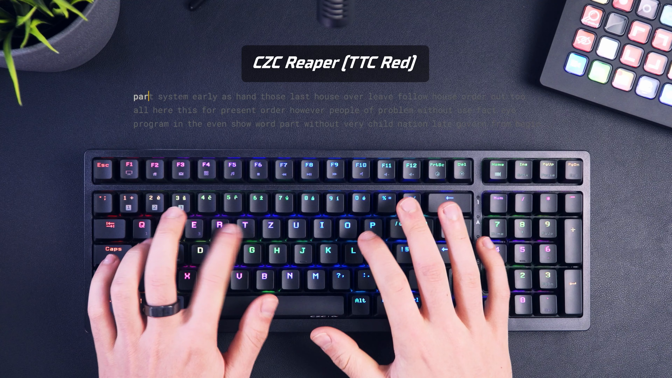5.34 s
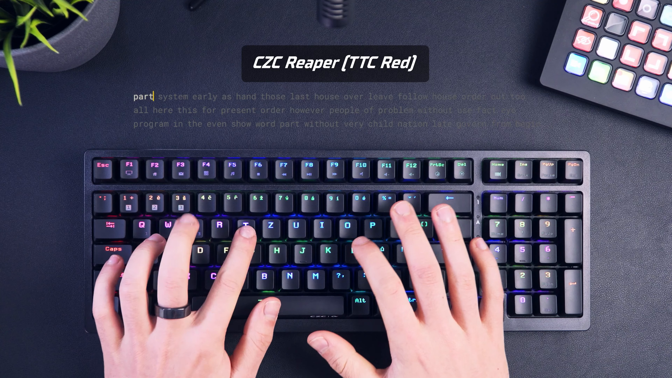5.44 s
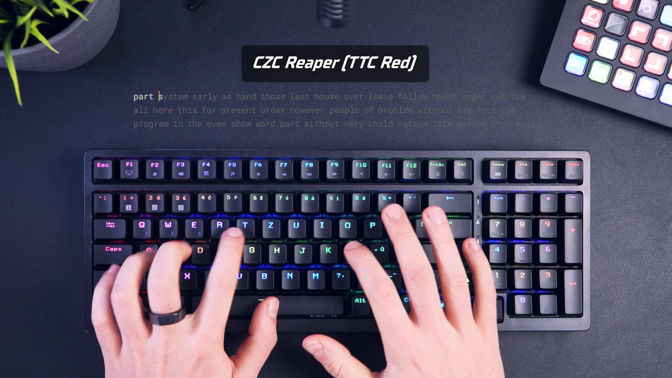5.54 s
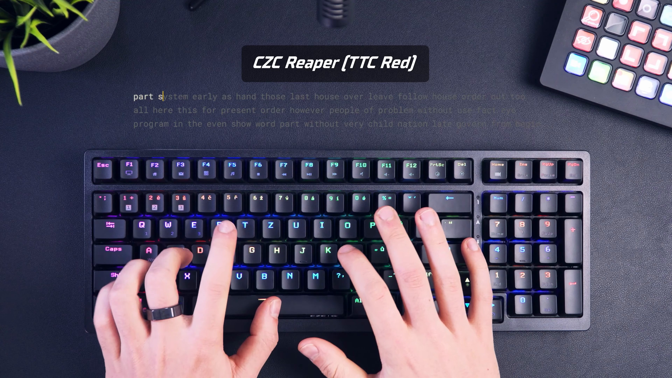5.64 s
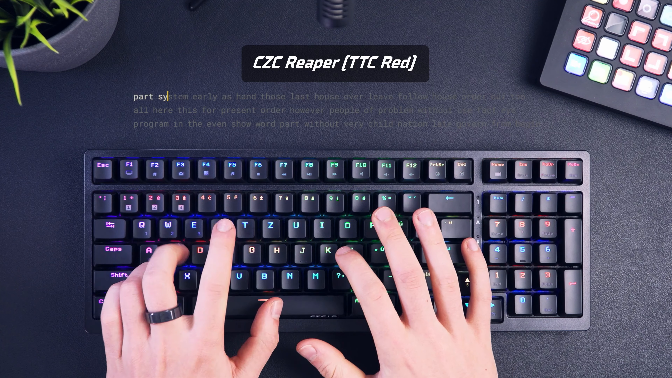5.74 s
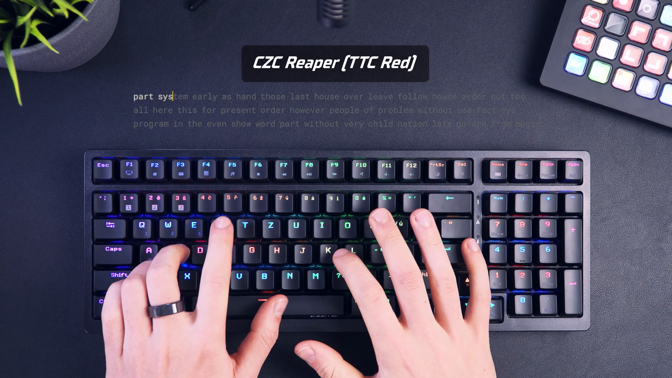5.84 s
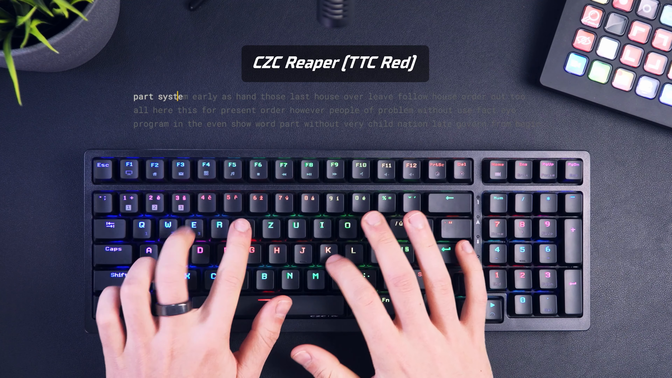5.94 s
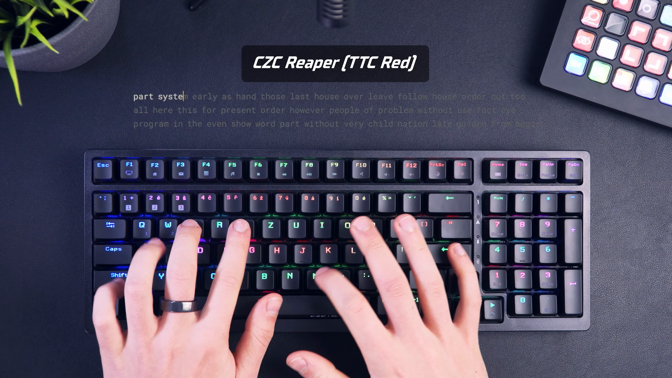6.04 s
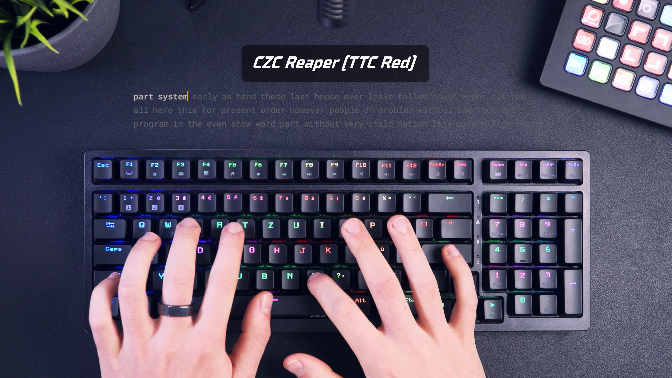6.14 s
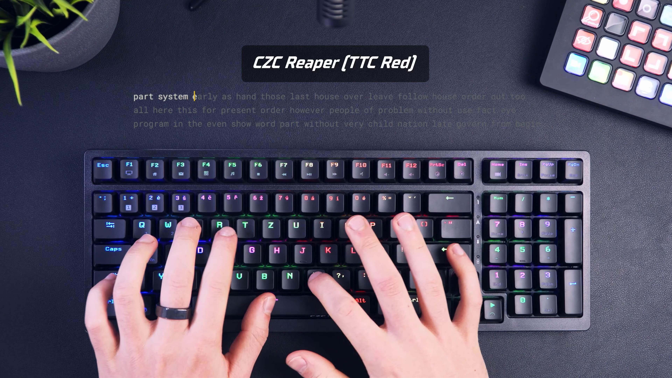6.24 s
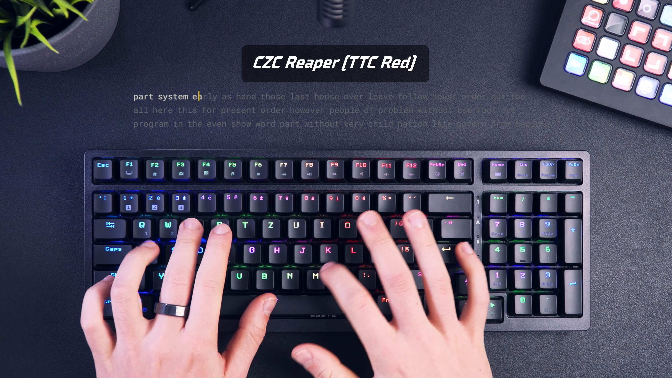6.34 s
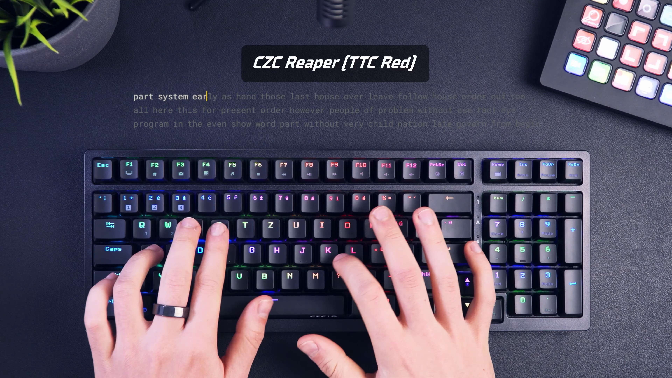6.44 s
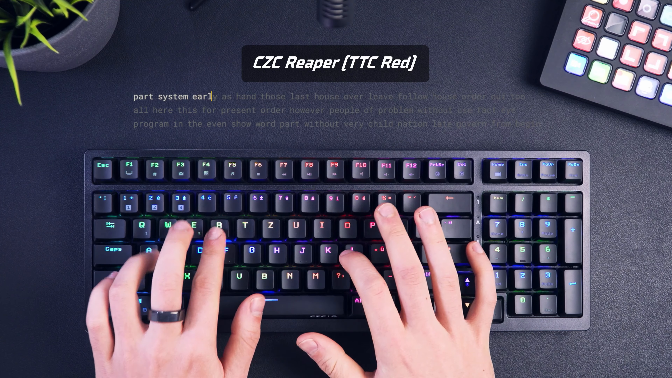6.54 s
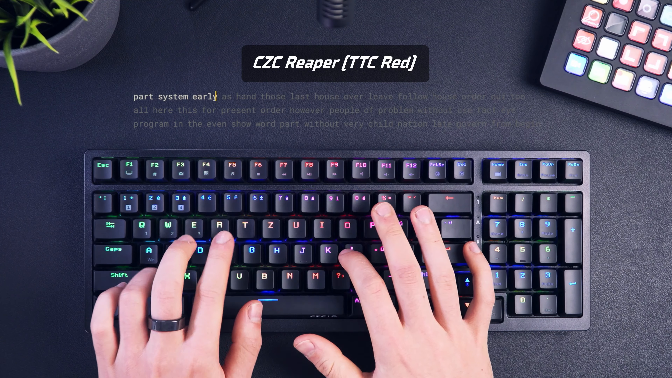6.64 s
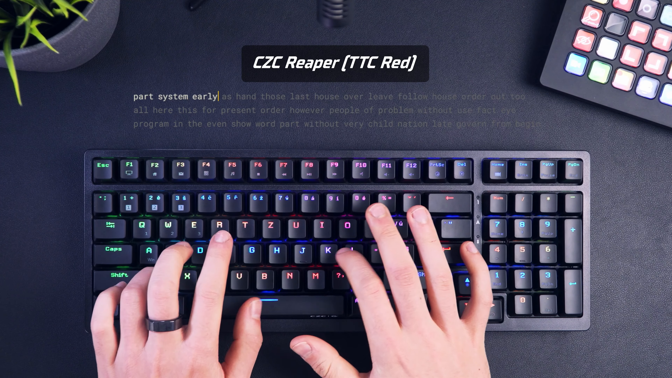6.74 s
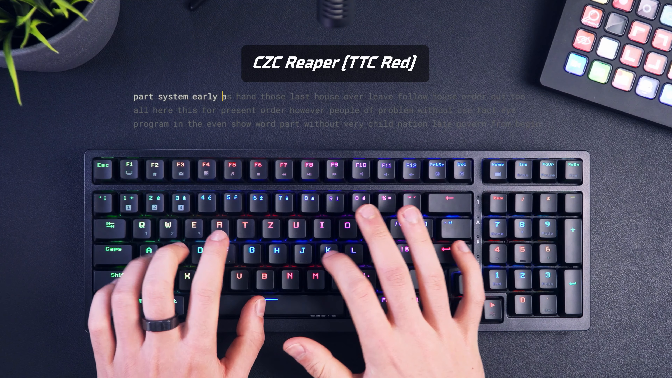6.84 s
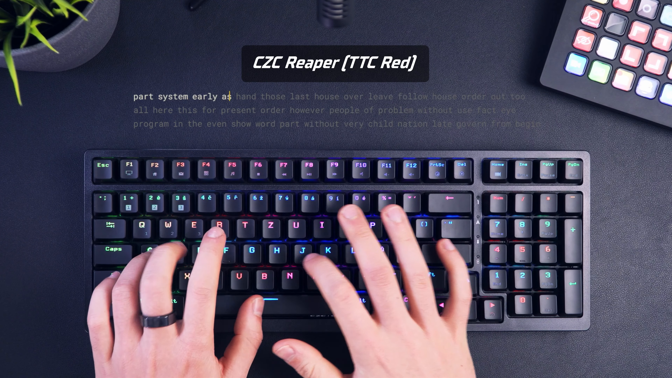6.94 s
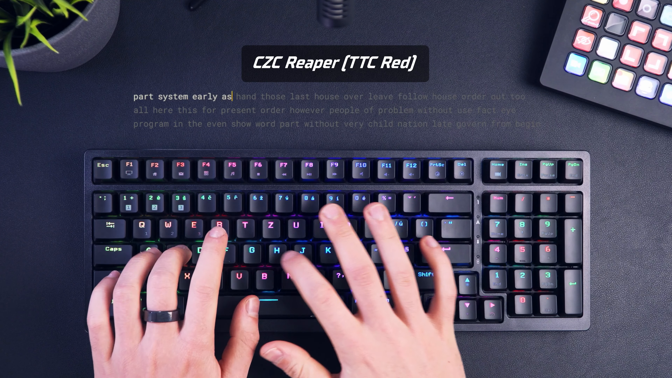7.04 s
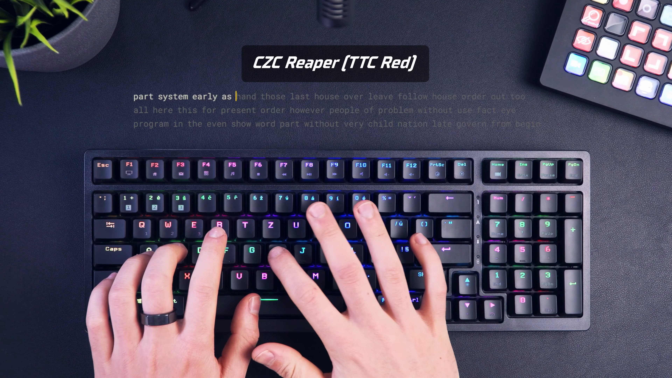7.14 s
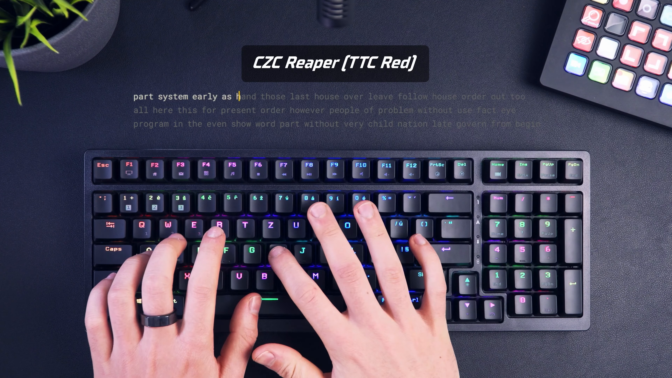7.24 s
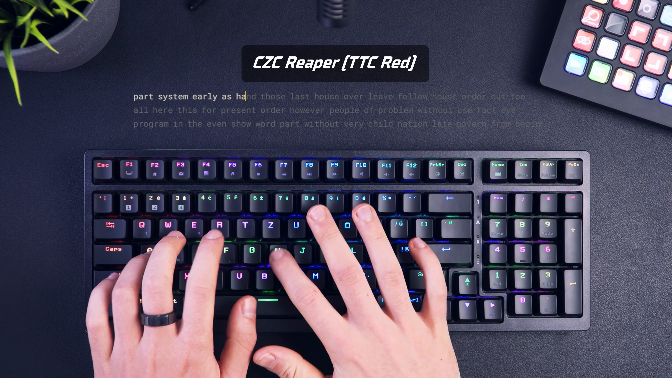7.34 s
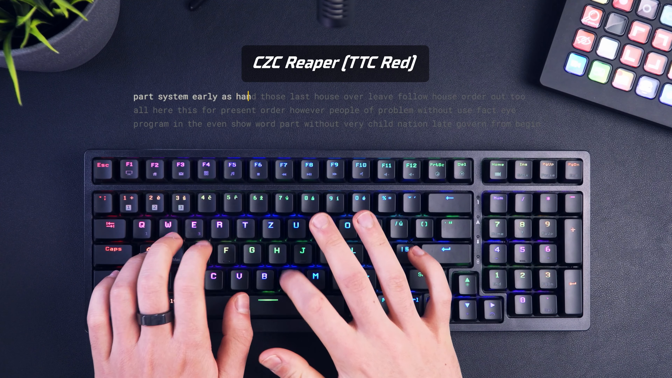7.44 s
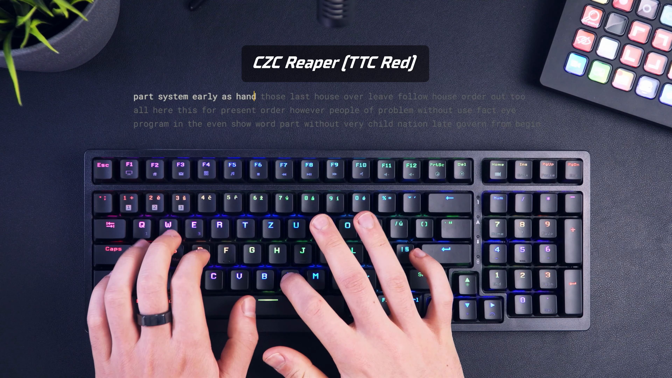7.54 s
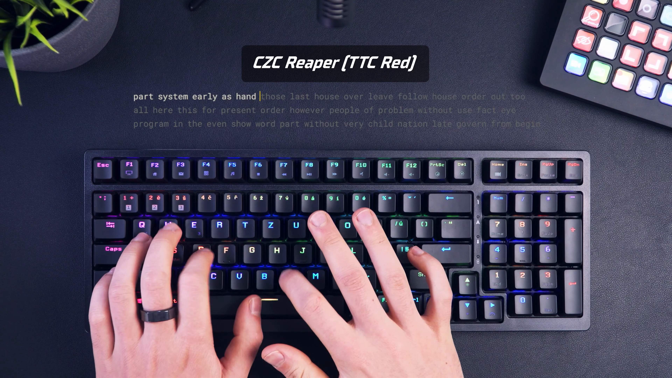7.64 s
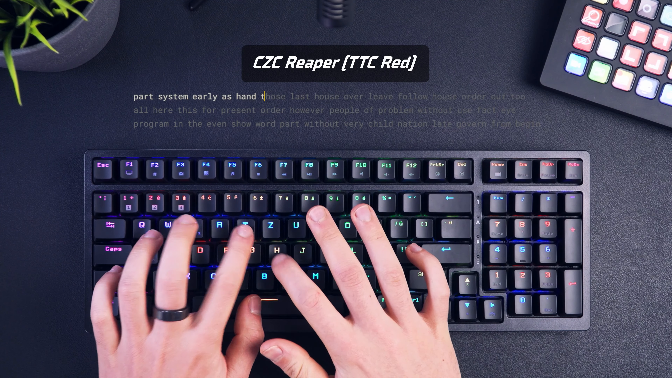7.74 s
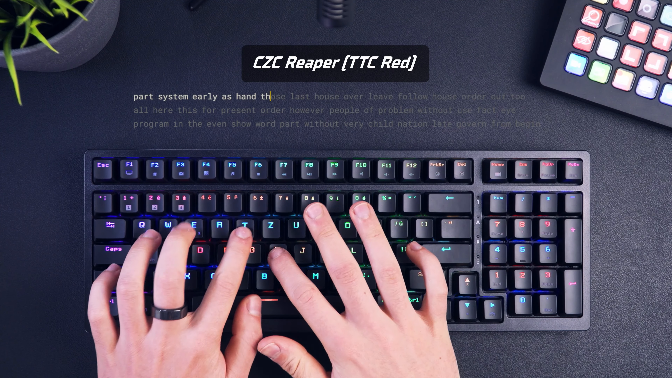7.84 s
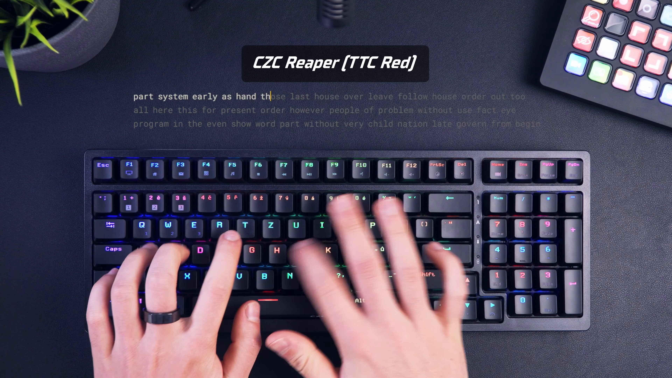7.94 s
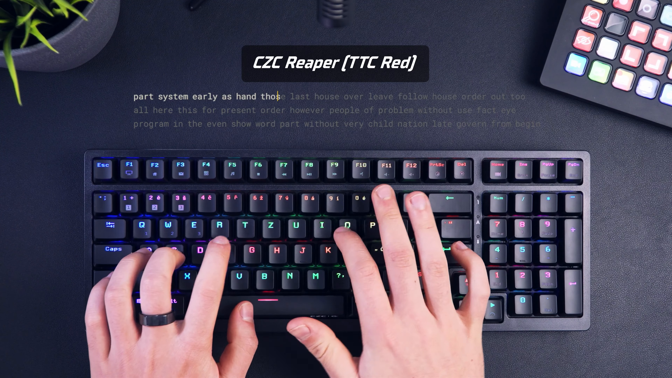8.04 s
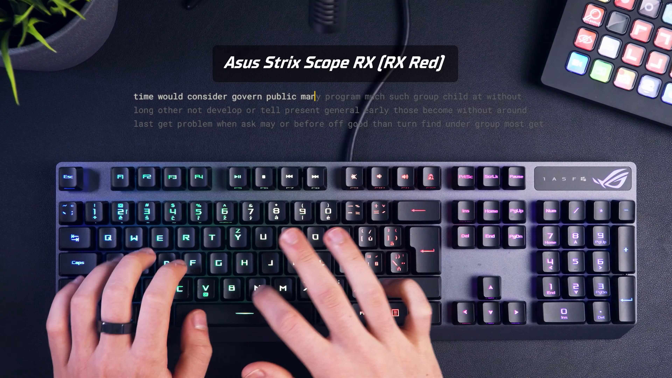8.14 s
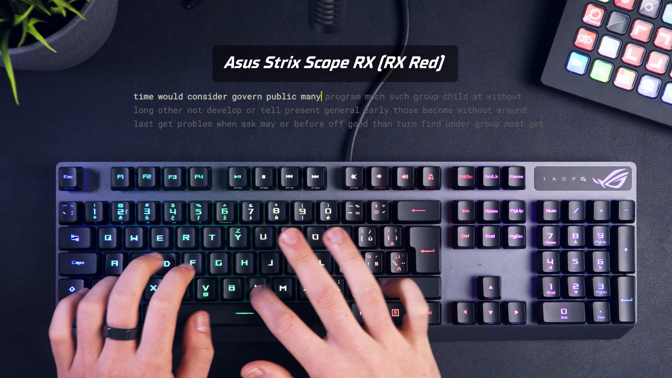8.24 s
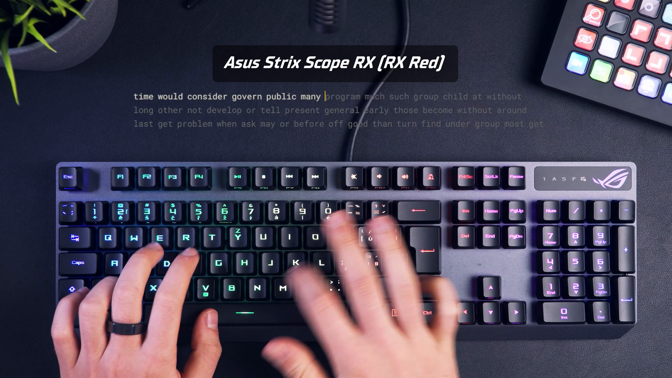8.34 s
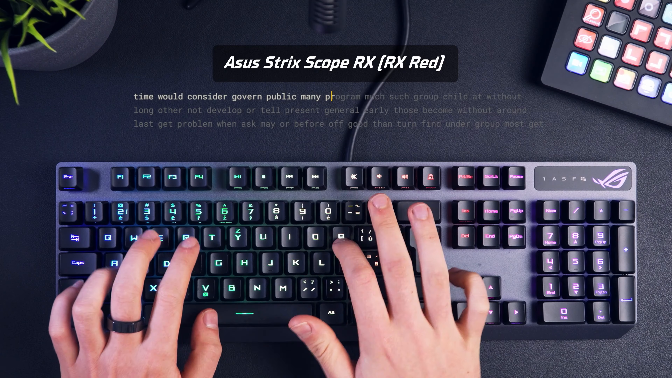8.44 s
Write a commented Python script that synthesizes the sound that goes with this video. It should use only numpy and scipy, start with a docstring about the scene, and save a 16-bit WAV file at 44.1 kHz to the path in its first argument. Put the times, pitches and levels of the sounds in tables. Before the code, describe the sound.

Single keys of a mechanical keyboard are tested slowly and quickly, then after a near-silent gap rapid typing rattles on, ending on a second, different-sounding keyboard.

```python
"""A space bar scrapes down over quiet room air and snaps on a mechanical keyboard, on a desk close to the one microphone.
Then one key is tapped quickly, another slowly; after a pause with a faint hiss both hands type fast,
and the last few strokes fall on a second keyboard. Each stroke rings damped modes and noise bursts of case, plate and
keycap, in shares set by its strength and by press or spring-back; rubs and scrapes are noise broken into spurts.
The desk hums under the knocks, and the small room adds a short tail of decaying noise to the keyboard sounds."""
import sys
import numpy as np
from scipy import signal
from scipy.fft import rfft, irfft, next_fast_len
from scipy.io import wavfile
from scipy.ndimage import map_coordinates

SR = 44100
rng = np.random.default_rng(int(sys.argv[2]) if len(sys.argv) > 2 else 0)


def store_pcm(level_fs):
    """Save levels as 16-bit WAV."""
    pcm = np.round(np.clip(level_fs, -1, 1) * 32767).astype(np.int16)
    wavfile.write(sys.argv[1], SR, np.atleast_2d(pcm).T)


N = 373968

# Space bar hitting its stop, first alone, then between words: [t/s, strength level/dB]
SPACE_BAR = [(0.1288, -34.0), (0.3274, -33), (0.565, -33.0), (0.7509, -34), (5.7836, -35), (6.2588, -38),
             (6.501, -36), (7.081, -33.0), (7.3789, -32.5), (7.92, -34.5)]
# One key tapped quickly: [t/s, strength level/dB]
QUICK_KEY = [(1.085, -36.5), (1.1749, -34), (1.266, -40.5), (1.3536, -39.5), (1.4395, -40.0),
             (1.521, -39.0), (1.6014, -41.5), (1.6918, -43), (1.7867, -44.5), (1.8821, -40.5)]
# One key eased down and let snap back: [t/s, strength level/dB]
SLOW_KEY = [(2.2073, -40), (2.362, -35.5), (2.541, -37.5), (2.7084, -40), (2.873, -45), (3.031, -40.0),
            (3.1983, -41.5), (3.3506, -38.0), (3.5427, -32.5)]
# Typed keys driven to the bottom: [t/s, strength level/dB, cap-over-plate brightness level/dB, pitch ratio]
PRESSES = [(5.1691, -32.5, 3, 1.09), (5.2632, -43, -6.5, 1.04), (5.355, -34.5, 8.5, 0.91),
           (5.6328, -40, 7, 1.06), (5.7182, -45.5, -3, 0.95), (5.8452, -38.5, 0.5, 0.99),
           (5.9434, -39.5, -4.5, 1.05), (6.1379, -34, -1.5, 0.99), (6.4045, -41.5, -3.0, 0.97),
           (6.6288, -39.0, 2, 0.96), (6.6726, -41, 2, 0.96), (6.7953, -38.5, 1.5, 1.04),
           (6.9029, -36.5, 1.5, 0.97), (7.0201, -39.0, -1, 0.93), (7.0956, -37, -1.5, 1.14),
           (7.2112, -38, -1.5, 1.02), (7.4652, -38.5, 0.5, 0.974), (7.604, -32.5, -0.5, 1.06),
           (7.7009, -45.0, -6, 1.08), (7.752, -35.5, 1.5, 1.1), (7.7864, -31, 7, 1),
           (7.8724, -32.5, 3.5, 1.07), (8.0394, -37.5, 4, 0.96), (8.152, -31.5, 0.5, 1.11)]
# Typed keys springing back up: [t/s, strength level/dB, cap-over-plate brightness level/dB]
RELEASES = [(5.3096, -44, 3), (5.3884, -40.5, -1), (5.453, -38, 4), (5.8171, -37, 5), (6.004, -39, 2.5),
            (6.0298, -40.5, 2), (6.0625, -36.5, 0), (6.183, -38.5, 8), (6.215, -35.5, 1.5),
            (6.3855, -45, -8.5), (6.573, -40.0, -0.5), (6.8477, -44, -1), (7.1486, -44, -2.5),
            (7.5621, -39, -1.0), (7.953, -40, -5), (7.9657, -38.5, 8.5)]
# Second keyboard, keys going down: [t/s, strength level/dB, cap-over-plate brightness level/dB]
SECOND_PRESSES = [(8.21, -42, -8), (8.326, -35, 13.5), (8.4669, -37.5, 3)]
# Second keyboard, keys coming up: [t/s, strength level/dB, cap-over-plate brightness level/dB]
SECOND_RELEASES = [(8.2345, -33.5, 11.5), (8.2964, -37.5, 11.5), (8.3949, -48.5, 4), (8.4295, -33.5, 9)]
# Set second landings of a loose cap: [t/s, level/dB]
SET_BOUNCES = [(1.3602, -39.5), (6.0109, -41.5), (7.3832, -33.5), (8.044, -32.5), (8.433, -33.5)]
# Fingers brushing neighbouring keycaps: [t/s, level/dB, nominal cap f/Hz]
TOUCHES = [(5.52, -45, 2820), (6.2256, -44, 2700), (6.5639, -43, 1930), (6.9954, -46.5, 1980),
           (7.4992, -44.5, 1410), (8.0152, -48, 1600), (8.4235, -44, 3520)]
# Keys pressed askew, scraping down their stems: [t/s, length/s, level/dB]
SCRAPES = [(6.316, 0.023, -43.5), (6.371, 0.023, -44.5), (8.273, 0.025, -45)]
# Hand or thumb landing softly on the board: [t/s, level/dB]
PUSHES = [(2.107, -40.5), (6.339, -41), (7.238, -38)]
# A faint brief hiss in the pause: [t/s, level/dB]
SWISH = [(4.362, -100), (4.393, -60.5), (4.56, -91)]

# Nominal modes of the space bar with its plate and case: [f/Hz, relative level/dB, t60/s]
SPACE_MODES = [(160, -21.5, 0.0095), (248.2, -11, 0.059), (335, -23.5, 0.044), (440.6, -13.5, 0.048),
               (571, -19, 0.027), (1178, -19.5, 0.025), (1615, -6, 0.015), (1820, -8, 0.015),
               (2230, -7.5, 0.023), (3470, -14.5, 0.015), (3500, -1.5, 0.00304), (5600, -9.5, 0.002)]
# Modes of the quickly tapped key: [f/Hz, relative level/dB, t60/s]
QUICK_MODES = [(155.4, -22, 0.11), (266, -18, 0.049), (380, -7.5, 0.011), (528, -14.5, 0.016),
               (930, -8, 0.02), (1116, -15.5, 0.074), (1367, -9.5, 0.019), (1620, -8, 0.031),
               (1995, -11.5, 0.016), (2810, 2, 0.012), (3536, -3.5, 0.024), (5950, 6, 0.0023)]
# Modes of the slowly tapped key: [f/Hz, relative level/dB, t60/s]
SLOW_MODES = [(245.6, -17.5, 0.064), (338, -2.5, 0.0092), (369, -11.5, 0.035), (435.5, -13, 0.026),
              (650, -12.5, 0.031), (1274, -12, 0.03), (1680, 2.5, 0.0015), (2290, -9, 0.008),
              (3300, 1, 0.004), (3535, -7.5, 0.021), (4644, -4.5, 0.0033), (6220, -5, 0.0026)]
# Modes of the typed keys: [f/Hz, relative level/dB, t60/s]
TYPING_MODES = [(147, -12.5, 0.037), (213, -7.5, 0.048), (288, -14.5, 0.011), (409, -13.5, 0.026),
                (988, -4.5, 0.02), (1263, -11, 0.055), (1483, -3, 0.031), (1993, 3, 0.0064),
                (2878, 0, 0.013), (3400, -18, 0.0032), (5300, -7.5, 0.0056), (7260, -4.5, 0.011),
                (8400, -6.5, 0.0015)]
# Modes of the second keyboard: [f/Hz, relative level/dB, t60/s]
SECOND_MODES = [(171, -8, 0.075), (230, -7.5, 0.065), (532, -7.5, 0.038), (1000, -35, .006),
                (1480, 8, 0.0062), (2702, 8.5, 0.015), (2910, 10, 0.009), (3406, -2, 0.014),
                (4000, 9, 0.0034), (6140, -17, 0.0025)]
# Modes of a lightly touched keycap, before scaling to its pitch: [f/Hz, relative level/dB, t60/s]
TOUCH_MODES = [(1311, -23.5, 0.024), (2350, -24, 0.0077), (2835, -1.5, 0.031), (3256, -2, 0.012)]
# Modes of the springs under the typed keys: [f/Hz, relative level/dB, t60/s]
SPRING_MODES = [(7400, 3, 0.065), (8050, 11.5, 0.016), (8400, -24.5, 0.16)]
# Modes of the slow key's spring: [f/Hz, relative level/dB, t60/s]
HIGH_SPRING_MODES = [(11430, 4, 0.05), (12400, 0, 0.035), (14330, -3, .08), (14500, -2.5, .06)]
# Modes of the desk top under knocks: [f/Hz, relative level/dB, t60/s]
DESK_MODES = [(27.65, -1.5, 0.98), (46.6, -1.5, 0.54), (64.7, 0.5, 0.65), (147.3, -1, 0.23),
              (222.3, -8.5, 0.47)]
# Modes of a soft push into the desk: [f/Hz, relative level/dB, t60/s]
PUSH_MODES = [(65, 2, 0.4), (107, -4.5, .2), (143, -3.5, 0.28), (215.6, -4.5, .2)]

# Noise spectrum of struck plastic: [f/Hz, relative density level/dB]
CRACK = [(120, 0), (300, 9.5), (750, 0.5), (1600, -0.5), (3300, 1), (4200, -7.5), (6200, -17), (8300, -13),
         (10500, -23), (15500, -28.5)]
# Noise spectrum of a light rub: [f/Hz, relative density level/dB]
RUB = [(400, -4.5), (1500, -5.5), (3200, 2.5), (4500, -5.5), (8000, -5), (11000, -12.5), (15500, -16.5)]
# Noise spectrum of a duller scrape: [f/Hz, relative density level/dB]
SCRAPE = [(400, 9), (950, 0.5), (1600, 0), (2300, -5), (3100, -1.5), (4500, -16.5), (15500, -24)]
# Noise spectrum of the quiet room air: [f/Hz, relative density level/dB]
AIR = [(12, -38.5), (20, 0), (74, -2), (107, -3.5), (154, -11.5), (248, -0.5), (270, -12), (337, -11),
       (574, -21.5), (6910, -34), (16000, -39)]
# Noise spectrum of the hiss: [f/Hz, relative density level/dB]
HISS = [(1500, -12), (5000, -2), (16000, -1.5)]
# Decay of the room tail: [f/Hz, t60/s]
ROOM_T60 = [(350, 0.46), (800, 0.18), (2500, 0.37), (12000, 0.0375)]
# Colour of the room tail: [f/Hz, relative level/dB]
ROOM_COLOUR = [(100, 5.5), (300, 9.5), (700, 1.0), (1400, -3.5), (3000, -17.5), (6000, -10), (14000, -0.5)]
# Ranges of case, plate and keycap: [lowest f/Hz, upper f/Hz]
BANDS = [(20, 700), (700, 2500), (2500, 16000)]

TOP_HZ = 16100
LEVEL_SPAN_S = .02
T = np.arange(int(.25 * SR)) / SR  # s, the span of a short sound
LONG_T = np.arange(SR // 2) / SR  # s, the span of a desk sound
TYPING_START_S = 5
# A slow tap is eased down, then the finger slips off with a tick, then the key snaps up; leads count back from the snap
BAR_EASE_LEAD_S, BAR_EASE_S, BAR_LAND_LEAD_S, BAR_SLIP_LEAD_S = .125, 0.06, .085, .026
KEY_EASE_LEAD_S, KEY_EASE_S, KEY_SLIP_LEAD_S = .112, 0.04, .0355
# Chance second landings: share of the strokes, median delay, level against the first click
BOUNCE_SHARE, BOUNCE_S, BOUNCE_DB = .25, 0.0046, -9.5
# Grazed caps: share of the typed strokes, longest wait, middle level, median cap pitch
GRAZE_SHARE, GRAZE_WAIT_S, GRAZE_DB, GRAZE_HZ = .5, 0.058, -53.5, 2900


def amp(db):
    """Decibels to gain."""
    return 10 ** (np.asarray(db) / 20)


def unit(x):
    """Scale to rms 1."""
    return x / np.sqrt(np.mean(x ** 2) + 1e-20)


def blow(x):
    """Scale a short sound to the energy of rms 1 held for LEVEL_SPAN_S."""
    return x / np.sqrt(np.sum(x ** 2) / (LEVEL_SPAN_S * SR) + 1e-20)


def along(points, hz):
    """Interpolate (f/Hz, value) points on a log frequency axis."""
    f, value = np.transpose(points)
    return np.interp(np.log(hz + 1), np.log(f), value)


def curve(rows):
    """Interpolate (t/s, value) rows to one value per sample."""
    return np.interp(np.arange(N) / SR, *np.transpose(rows))


def fade(t60, t=T):
    """Decay by 60 dB in t60 seconds."""
    return np.exp(-np.log(1000) * t / t60)


def noise(spectrum, size, band=(0, SR)):
    """Coloured noise of rms 1 inside a band."""
    hz = np.fft.rfftfreq(size, 1 / SR)
    inside = (hz >= band[0]) & (hz < band[1])
    white = rfft(rng.standard_normal(size))
    return unit(irfft(white * amp(along(spectrum, hz)) * inside, size))


def add(track, s, sound):
    """Mix a sound into the track at time s."""
    part = track[max(round(s * SR), 0):][:len(sound)]
    part += sound[:len(part)]


def ring(modes, detune, scatter_db, t=T):
    """Damped modes of alternating sign; every blow finds them at slightly new pitches and strengths."""
    hz, db, t60 = np.transpose(modes)[:, :, None]
    pitch, size = rng.standard_normal((2, len(modes), 1))
    sign = (-1) ** np.arange(len(modes))[:, None]
    wave = np.sin(2 * np.pi * hz * np.exp(detune * pitch) * t)
    return np.sum(sign * amp(db + scatter_db * size) * fade(t60, t) * wave, axis=0)


def played(rows, knock_db, knock_follows, bright_db=0):
    """From strength to (s, case knock dB, plate clack dB, keycap click dB, pitch ratio).
    The knock is mostly the weight behind the key; knock_follows is the share of the strength it takes up."""
    usual_db = np.mean([row[1] for row in rows])

    def stroke(s, db, own_bright_db=0, pitch=1):
        tilt_db = (bright_db + own_bright_db) / 2
        stroke_knock_db = usual_db + knock_db + knock_follows * (db - usual_db)
        return s, stroke_knock_db, db - tilt_db, db + tilt_db, pitch
    return [stroke(*row) for row in rows]


def air():
    """The quiet air of the room: steady coloured noise."""
    return amp(-63.5) * noise(AIR, N)


def grains(spectrum, length, rough_db):
    """Noise that swells and fades, broken into spurts of a few milliseconds, as in stick and slip."""
    size = round(length * SR)
    knots = np.arange(size) * 350 / SR  # 350 random levels a second
    spurts = map_coordinates(rng.standard_normal(len(T)), [knots], order=1)
    swell = signal.windows.tukey(size, .5)
    return unit(noise(spectrum, len(T))[:size] * amp(rough_db * spurts) * swell)


def tick(hz):
    """A fingertip tips a keycap against its stem; the cap's main mode lies near hz."""
    cap_hz = max(TOUCH_MODES, key=lambda mode: mode[1])[0]
    modes = [(f * hz / cap_hz, level, t60) for f, level, t60 in TOUCH_MODES]
    cap = blow(ring(modes, detune=0.067, scatter_db=6))
    return blow(cap + amp(-3.5) * blow(noise(CRACK, len(T)) * fade(0.039)))


def push():
    """A soft push goes through the keyboard into the desk as a few slowly starting low modes."""
    hum = ring(PUSH_MODES, detune=0, scatter_db=3, t=LONG_T)
    return blow(hum * (1 - fade(0.0086, LONG_T)))


def slow_bar_taps(scrape_db, wire_db, land_db, slip_db, bar_hz):
    """Before each lone snap the space bar scrapes down, rattles its wire, lands softly, and the thumb slips off."""
    track = np.zeros(N)
    for s, _ in SPACE_BAR:
        if s < TYPING_START_S:
            down = s - BAR_EASE_LEAD_S
            add(track, down, amp(scrape_db) * grains(SCRAPE, BAR_EASE_S, rough_db=11.0))
            for share in rng.random(2):
                add(track, down + share * BAR_EASE_S, amp(wire_db) * tick(bar_hz))
            add(track, s - BAR_LAND_LEAD_S, amp(land_db) * push())
            add(track, s - BAR_SLIP_LEAD_S, amp(slip_db) * tick(bar_hz))
    return track


def lead_ins(strokes, lead_s, spurts_db, tick_db):
    """A small tick and a faint spurting noise lead into each stroke, louder for a harder stroke."""
    track = np.zeros(N)
    for s, _, _, click_db, *_ in strokes:
        length = np.clip(lead_s * np.exp(.2 * rng.standard_normal()), .005, .2)
        gain = amp(.5 * click_db + 0.47 * rng.standard_normal())
        start_tick = blow(noise(SCRAPE, len(T)) * fade(0.053))
        add(track, s - length, gain * amp(tick_db) * start_tick)
        add(track, s - length, gain * amp(spurts_db) * grains(RUB, length, rough_db=11.5))
    return track


def keys(strokes, modes, detune, crack_db, crack_t60, clack_t60, knock_t60, dense_db, bright_db):
    """Each stroke rings case, plate and keycap: a few clear modes over dense ones that die like noise."""
    track = np.zeros(N)
    case_modes, plate_modes, cap_modes = (np.array([m for m in modes if lo <= m[0] < hi]) for lo, hi in BANDS)
    # harder plastic tilts the crack up, dB per octave
    crack = [(hz, db + bright_db * np.log2(hz)) for hz, db in CRACK]
    for s, knock_db, clack_db, click_db, pitch in strokes:
        key = [pitch, 1, 1]  # the key's place on the board shifts its pitch, not its strength or decay
        dense = [noise(crack, len(T), band) for band in BANDS]
        case = blow(ring(case_modes * key, 2 * detune, scatter_db=3.5))
        case += amp(dense_db) * blow(dense[0] * fade(knock_t60))
        plate = blow(ring(plate_modes * key, detune, scatter_db=2.5))
        plate += amp(dense_db) * blow(dense[1] * fade(clack_t60))
        cap = blow(ring(cap_modes * key, detune, scatter_db=3.84))
        cap += amp(crack_db) * blow(dense[2] * fade(crack_t60))
        # the light cap moves first, then the plate, and last the heavy case
        add(track, s, amp(click_db) * blow(cap * (1 - fade(0.00072))))
        add(track, s, amp(clack_db) * blow(plate * (1 - fade(0.0022))))
        add(track, s, amp(knock_db) * blow(case * (1 - fade(0.017))))
    return track


def desk(strokes):
    """Knocks set the desk top swaying and humming in its low modes."""
    track = np.zeros(N)
    for s, knock_db, *_ in strokes:
        hum = ring(DESK_MODES, detune=0.064, scatter_db=3.0, t=LONG_T)
        # even a quiet stroke carries the weight of the finger
        add(track, s, amp(0.5 * knock_db - 22.0) * blow(hum * (1 - fade(0.11, LONG_T))))
    return track


def room(x):
    """A short diffuse tail of decaying noise, longest and strongest in the low middle."""
    hz, t, z = signal.stft(rng.standard_normal(SR // 2), SR, nperseg=256)
    colour = amp(along(ROOM_COLOUR, hz))[:, None]
    early = 1 + 2.47 * fade(0.14, t)  # desk and near walls answer first
    decay = fade(along(ROOM_T60, hz)[:, None], t)
    tail = signal.istft(z * colour * early * decay, SR, nperseg=256)[1]
    delayed = np.pad(tail / np.linalg.norm(tail), (round(.004 * SR), 0))
    return signal.fftconvolve(x, delayed)[:N]


def quick_key_taps(lead_s, gap_s, tick_db, cap_hz):
    """The fingernail meets the quickly tapped cap with a double tick just before each stop."""
    track = np.zeros(N)
    for s, _ in QUICK_KEY:
        first = s - lead_s
        for start in (first, first + gap_s * (.5 + rng.random())):
            add(track, start, amp(tick_db + 2 * rng.standard_normal()) * tick(cap_hz))
    return track


def bounces(strokes):
    """Now and then a loose cap lands a second time: a thin click without the knock."""
    track, landings = np.zeros(N), list(SET_BOUNCES)
    for s, _, _, click_db, _ in strokes:
        chance, flight = rng.random(), np.exp(0.51 * rng.standard_normal())
        if chance < BOUNCE_SHARE:
            landings.append((s + BOUNCE_S * flight, click_db + BOUNCE_DB))
    for s, db in landings:
        click = blow(noise(CRACK, len(T), (1000, SR)) * fade(0.014))
        click += amp(-11.0) * blow(ring(TOUCH_MODES, detune=0.035, scatter_db=7.5))
        add(track, s, amp(db) * blow(click))
    return track


def slow_key_taps(rub_db, land_db, spring_db, slip_db, cap_hz):
    """Before each snap the slow key rubs down, lands softly on the case, and the finger slips off.
    Its spring sings as the key starts down and again at the snap."""
    track = np.zeros(N)
    case_modes = [mode for mode in SLOW_MODES if mode[0] < BANDS[0][1]]
    for s, _ in SLOW_KEY:
        down = s - KEY_EASE_LEAD_S
        add(track, down, amp(rub_db) * grains(RUB, KEY_EASE_S, rough_db=9.5))
        landing = ring(case_modes, detune=.03, scatter_db=7.0) * (1 - fade(0.0085))
        add(track, down + 0.01165, amp(land_db) * blow(landing))
        for start in (down, s):
            add(track, start, amp(spring_db) * blow(ring(HIGH_SPRING_MODES, detune=.012, scatter_db=6)))
    for s, _ in SLOW_KEY[:-1]:  # from the last tap the finger lifts cleanly
        add(track, s - KEY_SLIP_LEAD_S, amp(slip_db) * blow(tick(cap_hz) * fade(0.019)))
    return track


def touches():
    """Stray contacts of the hands: brushed caps, keys pressed askew, the hand settling."""
    track = np.zeros(N)
    for s, db, hz in TOUCHES:
        add(track, s, amp(db) * tick(hz))
    for s, length, db in SCRAPES:
        add(track, s, amp(db) * grains(SCRAPE, length, rough_db=3.5))
    for s, db in PUSHES:
        add(track, s, amp(db) * push())
        add(track, s, amp(db - 5.5) * blow(noise(CRACK, len(T), BANDS[0]) * fade(0.032)))
    return track


def swish():
    """A faint high hiss in the pause: coloured noise under a brief swell."""
    t = np.arange(N) / SR
    gain = curve([(s, amp(db)) for s, db in SWISH])
    sounding = (t > SWISH[0][0]) & (t < SWISH[-1][0])
    return gain * sounding * noise(HISS, N)


def springs(strokes):
    """The switch springs ping faintly with each typed stroke."""
    track = np.zeros(N)
    for s, _, _, click_db, _ in strokes:
        add(track, s, amp(click_db - 17.5) * blow(ring(SPRING_MODES, detune=0.019, scatter_db=1)))
    return track


def grazes(strokes):
    """On its way to the next key a finger often grazes a cap."""
    track = np.zeros(N)
    for s, *_ in strokes:
        chance, wait = rng.random(2)
        size, pitch = rng.standard_normal(2)
        gain = (chance < GRAZE_SHARE) * amp(GRAZE_DB + 0.83 * size)
        add(track, s + GRAZE_WAIT_S * np.sqrt(wait), gain * tick(GRAZE_HZ * np.exp(.25 * pitch)))
    return track


def scene():
    """All the keys, the desk under them and the room around them."""
    space = played(SPACE_BAR, knock_db=1.5, knock_follows=1.0, bright_db=-6.5)
    quick = played(QUICK_KEY, knock_db=-5, knock_follows=0.77, bright_db=-2.0)
    slow = played(SLOW_KEY, knock_db=-0.5, knock_follows=0.76, bright_db=2.5)
    # a press has the finger's weight behind it, a release only the spring
    typed = played(PRESSES, knock_db=0, knock_follows=.25)
    typed += played(RELEASES, knock_db=-7.5, knock_follows=.4)
    second = played(SECOND_PRESSES, knock_db=0, knock_follows=0.16)
    second += played(SECOND_RELEASES, knock_db=-10, knock_follows=0.88)

    board = keys(space, SPACE_MODES, detune=0.0015, crack_db=9.5, crack_t60=0.014,
                 clack_t60=0.029, knock_t60=0.081, dense_db=-9.5, bright_db=1.5)
    board += keys(quick, QUICK_MODES, detune=0.023, crack_db=-6.5, crack_t60=0.021,
                  clack_t60=.04, knock_t60=0.051, dense_db=-7, bright_db=-0.8)
    board += keys(slow, SLOW_MODES, detune=0.014, crack_db=-5.5, crack_t60=0.013,
                  clack_t60=0.024, knock_t60=0.049, dense_db=-1, bright_db=0.5)
    board += keys(typed, TYPING_MODES, detune=0.057, crack_db=-1, crack_t60=.013,
                  clack_t60=0.033, knock_t60=0.036, dense_db=-6.5, bright_db=2.2)
    board += keys(second, SECOND_MODES, detune=0.049, crack_db=-1, crack_t60=0.023,
                  clack_t60=0.025, knock_t60=0.041, dense_db=-5.5, bright_db=-3.5)
    board += lead_ins(quick, lead_s=.026, spurts_db=-41.0, tick_db=-37.5)
    board += lead_ins(space + slow, lead_s=0.023, spurts_db=-42, tick_db=-41.5)
    board += lead_ins(typed + second, lead_s=0.032, spurts_db=-39.0, tick_db=-38.5)
    board += slow_bar_taps(scrape_db=-49, wire_db=-60.5, land_db=-40.5, slip_db=-50.5, bar_hz=2210)
    board += slow_key_taps(rub_db=-60.5, land_db=-54, spring_db=-70.5, slip_db=-48.5, cap_hz=2900)
    board += quick_key_taps(lead_s=.023, gap_s=0.011, tick_db=-61, cap_hz=3370)
    board += grazes(typed) + touches() + springs(typed)
    board += bounces(quick + typed + second)
    around = desk(space + quick + slow + typed + second) + swish() + air()
    return (board + amp(-15.0) * room(board) + around)[None]


def record(dry):
    """The recorder keeps nothing above its band limit."""
    size = next_fast_len(N + SR // 2)
    kept = np.fft.rfftfreq(size, 1 / SR) < TOP_HZ
    return irfft(rfft(dry, size) * kept, size)[:, :N]


dry = scene()
out = record(dry)
store_pcm(out)
```